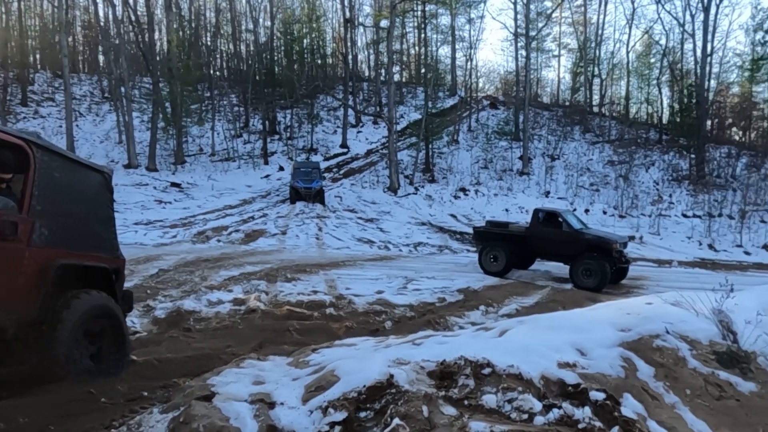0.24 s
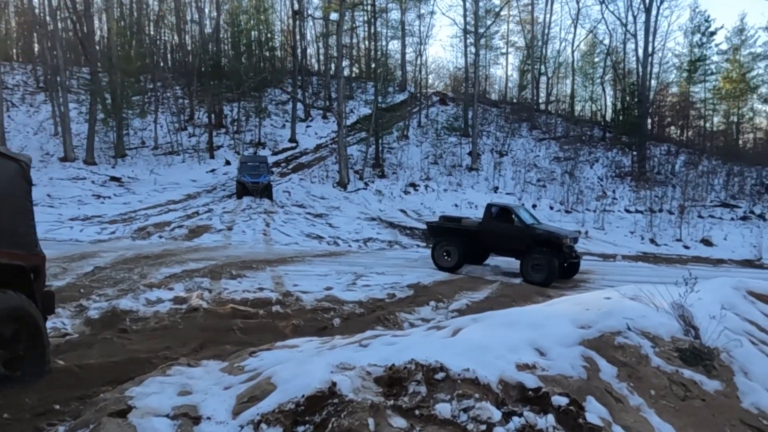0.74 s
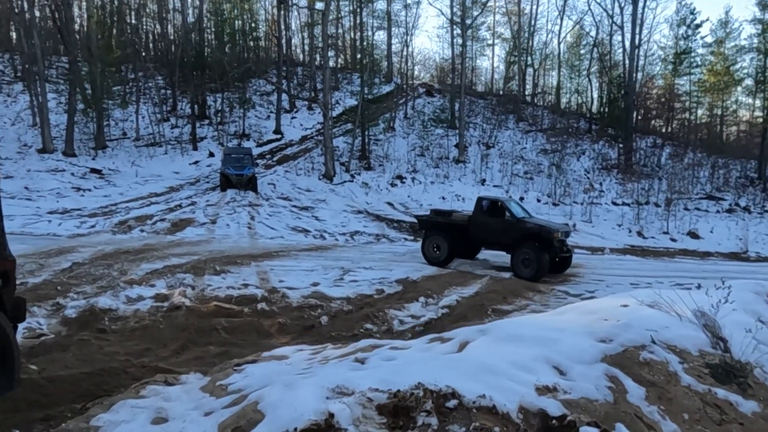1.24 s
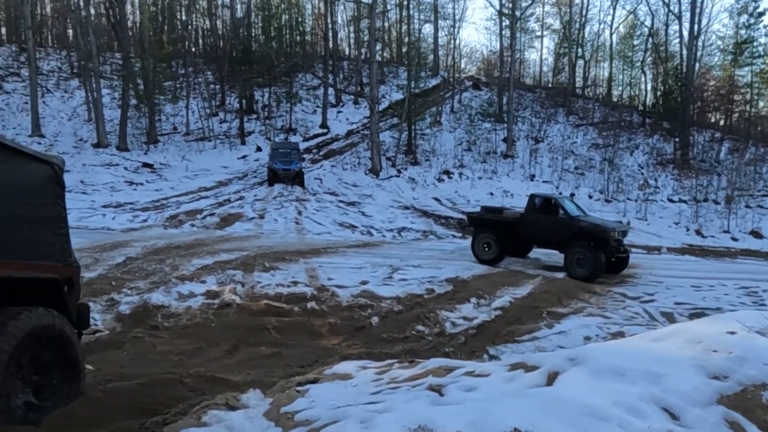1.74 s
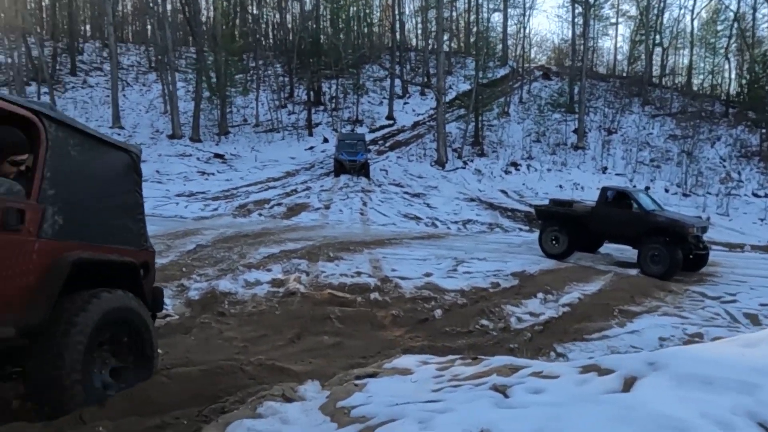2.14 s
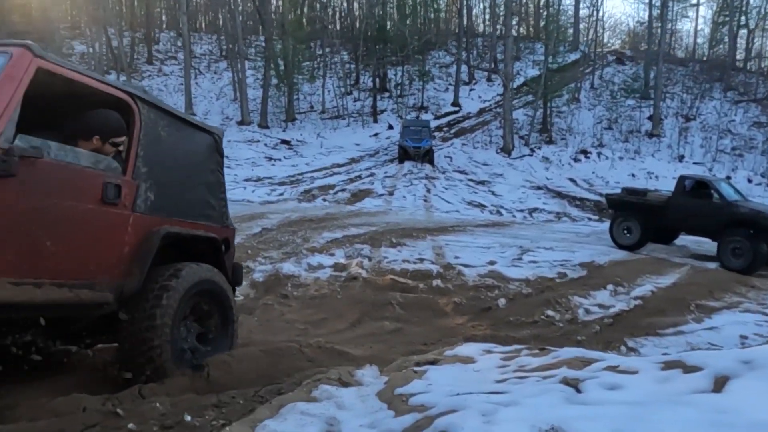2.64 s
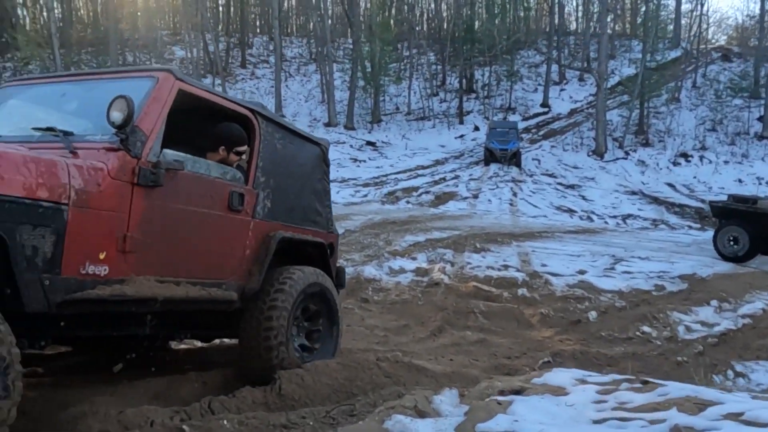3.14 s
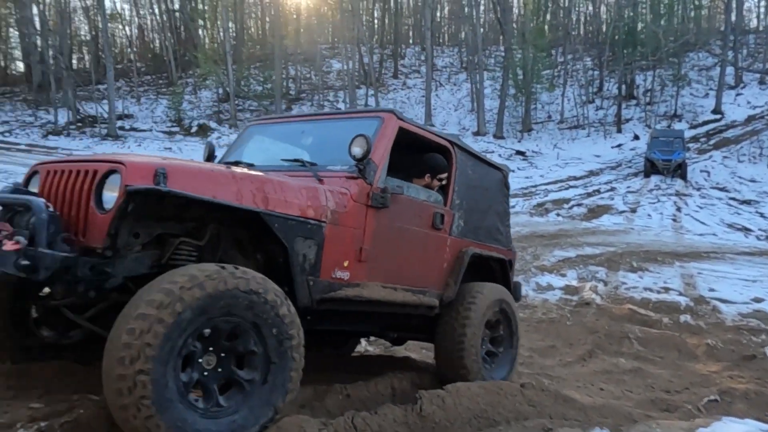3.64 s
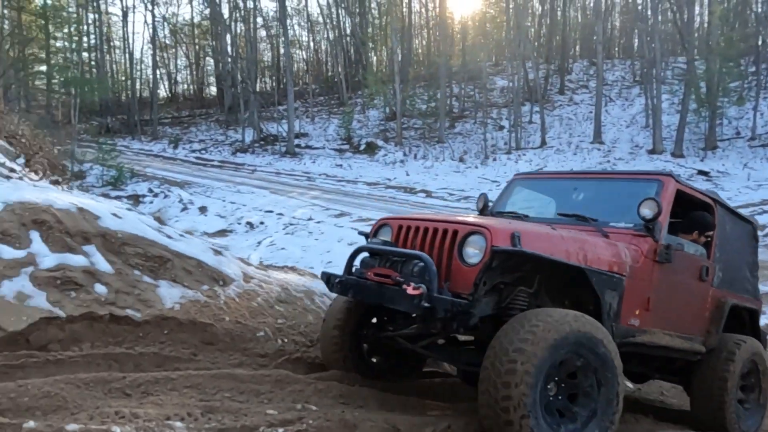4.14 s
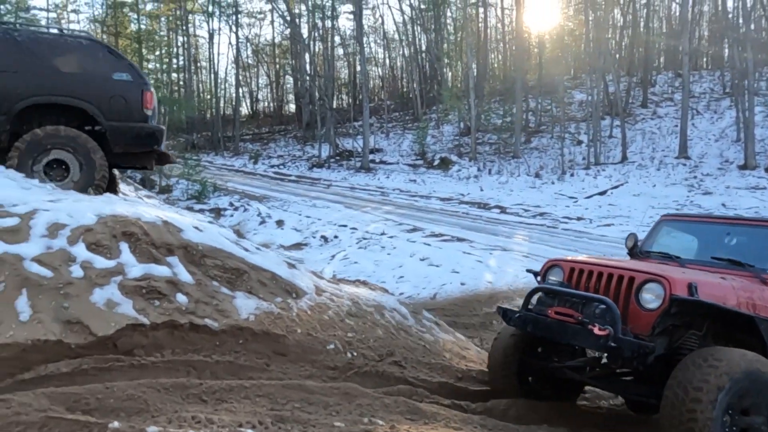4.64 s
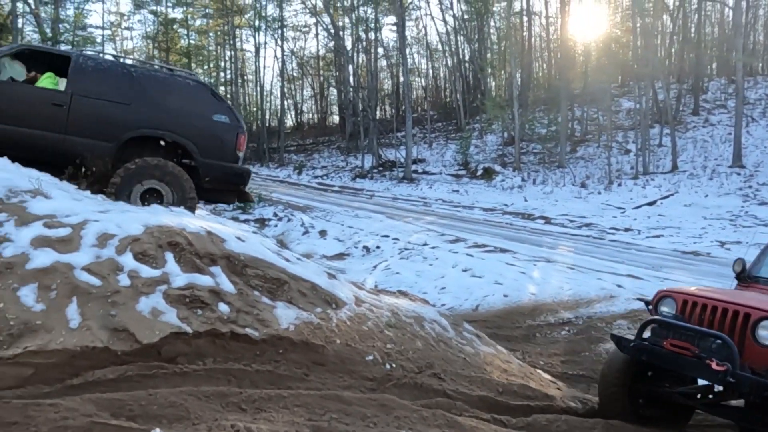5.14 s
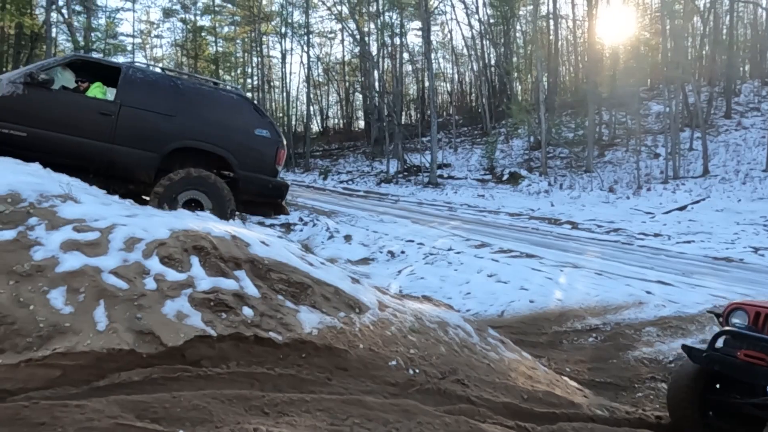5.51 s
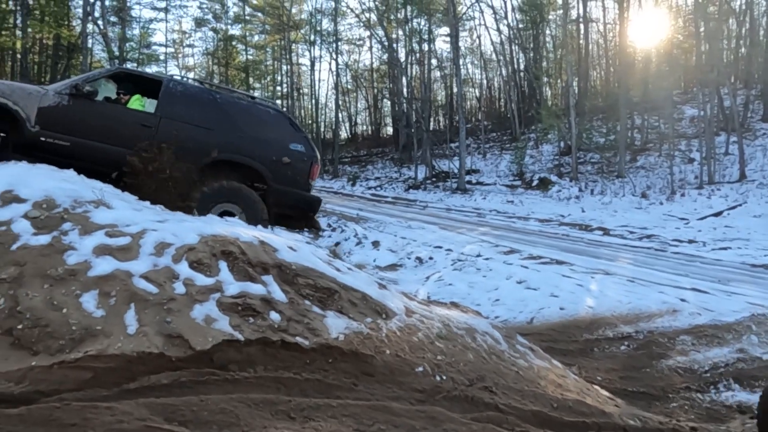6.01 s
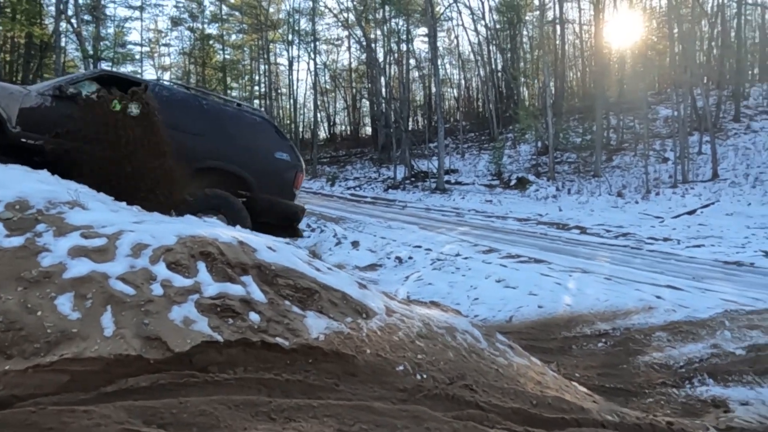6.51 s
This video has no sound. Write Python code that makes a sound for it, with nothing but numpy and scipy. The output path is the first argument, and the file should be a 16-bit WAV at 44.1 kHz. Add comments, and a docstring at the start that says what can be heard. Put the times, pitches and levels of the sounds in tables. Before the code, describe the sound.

Off-road engines outdoors: deep drone and thin squeaks give way to repeated roaring throttle bursts, a popping lull, then a final climbing rev.

```python
"""A steady engine drone with squeals on the left, then hard revving: two eight-cylinder trucks, sand hill, open woods.
Drone: engine-order tones over firing-gated clatter; it slows and fades out. Revved engine: orders sweep through fixed
pipe resonances, firings gate rasp and hiss, throttle stabs open and shut it; its image moves from left to near centre.
Brakes, belts and whistles squeal as gliding sines; pops, shrill air and wind are shaped noise, as is the rumble."""
import sys
import numpy as np
from scipy import signal
from scipy.fft import rfft, irfft, next_fast_len
from scipy.io import wavfile
from scipy.ndimage import uniform_filter1d

SR = 44100
rng = np.random.default_rng(int(sys.argv[2]) if len(sys.argv) > 2 else 0)


def int16_out(signal):
    """Quantize to a 16-bit WAV file."""
    q = np.round(np.clip(np.atleast_2d(signal).T, -1, 1) * 32767)
    wavfile.write(sys.argv[1], SR, q.astype(np.int16))


N = 298557
T = np.arange(N) / SR


def from_db(db):
    """Gain of a level in dB."""
    return 10 ** (np.asarray(db) / 20)


def rms_one(x):
    """Scaled to rms 1."""
    return x / np.sqrt(np.mean(x ** 2) + 1e-20)


def in_time(rows):
    """Columns of a time table, one value per sample."""
    s, *columns = np.transpose(rows)
    return [np.interp(T, s, c) for c in columns]


def at_hz(points, hz):
    """Spectrum table read on a log-frequency axis."""
    table = np.array(points)
    return np.interp(np.log(hz), np.log(table[:, 0]), table[:, 1])


def above(hz, corner_hz):
    """Octaves above a corner, zero below it."""
    return np.log2(np.maximum(hz / corner_hz, 1))


def drift(rate_hz):
    """Slow random wander of spread 1, computed every 40 samples."""
    r = np.exp(-80 * np.pi * rate_hz / SR)
    noise = rng.standard_normal(N // 40 + 2002)
    slow = signal.lfilter([1], [1, -2 * r, r * r], noise)[2000:]
    return np.interp(np.arange(N) / 40, np.arange(len(slow)), rms_one(slow))


def coloured(spectrum, gate=1, repeating=0):
    """Gated white noise plus optional repeating part, shaped by a spectrum, silent outside it; rms 1."""
    size = next_fast_len(N)
    hz = np.maximum(np.arange(size // 2 + 1) * SR / size, 1)
    inside = (hz > spectrum[0][0]) & (hz < spectrum[-1][0])
    source = gate * (rng.standard_normal(N) + repeating)
    shaped = rfft(source, size) * from_db(at_hz(spectrum, hz)) * inside
    return rms_one(irfft(shaped, size)[:N])


def pan(x, left_db):
    """Two channels, left over right by left_db; their mean stays x."""
    ratio = from_db(left_db)
    return x * np.array([ratio, np.ones_like(ratio)]).reshape(2, -1) * 2 / (1 + ratio)


def crank(cycle_hz, wobble):
    """Engine-cycle angle in rad; the speed wavers slightly."""
    return 2 * np.pi * np.cumsum(cycle_hz * (1 + wobble * drift(8))) / SR


# firings of one cycle, 1 = leaves by the nearer pipe: [flag]
NEAR_PIPE = [1, 0, 1, 1, 0, 1, 0, 0]


def firing_phase():
    """Order phases that follow from uneven cylinders dealt to two pipes."""
    return np.angle(np.fft.fft(NEAR_PIPE + 0.12 * rng.standard_normal(len(NEAR_PIPE))))


def puffs(angle, sharp):
    """Gate that jumps at each firing and decays, larger for the nearer pipe."""
    firings = angle * 8 / (2 * np.pi)
    cylinder = firings.astype(int) % 8
    return (2.2 + np.take(NEAR_PIPE, cylinder)) * (np.exp(-sharp * (firings % 1)) + .9)


# revved engine speed: [start_s, cycle_hz]
REV_SPEED = [(0.0, 22.1), (0.21, 20.9), (0.81, 12.1), (0.98, 11.9), (1.32, 21.9), (1.71, 29.6),
             (2.02, 23.4), (2.3, 25.6), (2.45, 20.8), (2.85, 35.4), (3.07, 33.7), (3.37, 38.8),
             (3.58, 35.6), (3.92, 43.4), (4.0, 41.7), (4.19, 33.9), (4.44, 25.1), (4.72, 13.7),
             (4.81, 11.9), (5.09, 20.6), (5.14, 21.0), (5.21, 20.1), (5.41, 11.7), (5.7, 20.6),
             (6.08, 30.0), (6.22, 33.4), (6.39, 36.6), (6.58, 39.1), (6.77, 40.5)]
# how far left and how scattered, throttle open: [start_s, left_db, wide_db]
SIDE = [(0, 4, -2), (.9, 7, -1), (1.4, 19, 4.5), (2.0, 10, 2), (2.6, 12, 1.5), (3.75, 10.5, 1),
        (4.03, 5, -5.5), (4.55, -6, 4.5), (5.0, 1.5, -28), (6.77, -1, -37)]


def revving():
    """Orders, growl, rasp and hiss of one engine; lower parts stand nearer the centre than the rasp."""
    (cycle_hz,), (_, wide_db) = in_time(REV_SPEED), in_time(SIDE)
    (boom_db, bark_db, rasp_db, hiss_db, _), ring_hz, ring_db, left_db = throttle()
    acceleration = uniform_filter1d(np.gradient(cycle_hz) * SR, size=2000)
    slowing = np.clip(-acceleration / 10, 0, 1)
    angle = crank(cycle_hz, wobble=.0015)
    overrun = np.clip((-31 - rasp_db) / 8, 0, 1)  # throttle shut: the engine burbles
    facing = np.clip(1 - np.abs(left_db) / 4, 0, 1)
    boom, bark = rev_orders(cycle_hz, angle, slowing, overrun, facing)
    # at low speed the firings are uneven and the orders blur into growl
    clear = np.clip((cycle_hz - 10) / 18, .1, 1) * (1 - .45 * overrun)
    bark = bark * from_db(bark_db + 6.0) * clear + growl(angle, bark_db, clear)
    rasp = exhaust_rasp(cycle_hz, angle, rasp_db, facing) + throat(cycle_hz, angle, rasp_db, ring_hz, ring_db)
    hiss = intake_hiss(angle, hiss_db) + alternator(cycle_hz, angle, hiss_db, slowing)
    # scattered by trees, opposite in the two channels
    wide = from_db(hiss_db - 6.5) * coloured(HISS) + from_db(rasp_db - 18) * coloured(RASP)
    wide *= from_db(wide_db)
    out = pan(np.sqrt(2) * from_db(boom_db) * boom, 0.023 * left_db)
    out += pan(bark, 0.24 * left_db) + pan(rasp, left_db) + pan(hiss, .45 * left_db)
    return out + wide * [[1], [-1]]


# boom orders, repeating every eight: [multiple, level_db]
REV_ORDERS = [(1, -31.5), (2, -3), (3, -3.5), (4, -17), (5, 4), (6, -6), (7, -4), (8, 7)]
# muffler boom: [hz, gain_db]
BOOM_PIPE = [(25, -17.5), (50, -9), (64, 0), (75, -6.5), (110, 2.5), (140, 0), (190, -12.5), (240, -30),
             (300, -33.5)]
# tailpipe resonances: [hz, gain_db]
BARK_PIPE = [(200, 3), (270, 5), (360, 3.5), (440, -0.5), (520, 0), (700, -3.5), (1000, -2), (1400, 3)]
# tailpipe orders from the sixth up, heard from ahead: [level_db]
BARK_AHEAD = [-23, -27, -15, -12, -18, -17, -19, -11, -15, -31, -19, -22, -35, -24, -22, -29, -33, -26, -30,
              -20, -27, -21, -33, -30, -20, -28, -29, -30]
# same, from the side: [level_db]
BARK_SIDE = [-26, -30, -20, -11, -20, -14, -25, -18, -19, -39, -19, -29, -36, -31, -33, -31, -32, -27, -34,
             -26, -36, -31, -34, -36, -33, -36, -36, -38]
# same, while the speed falls: [level_db]
BARK_SLOWING = [-26, -26, -21, -12, -18, -11, -21, -21, -22, -23, -15, -28, -30, -30, -29, -30, -29, -27,
                -13, -23, -25, -21, -31, -30, -31, -33, -32, -34]
# while slowing only the muffler's centre booms, and the orders even out by a share
COAST_LOSS_DB_PER_OCT, BOOM_HZ, COAST_EVEN_SHARE = 27, 110, .8
FIRING_TOP_HZ, FIRING_TOP_DB_PER_OCT = 127, 31  # the firing order and above boom only low down
SHUT_DULL_DB_PER_OCT = 26  # throttle shut: the bark loses its top
UPPER_ORDERS_DB_PER_CYCLE_HZ = 1.0  # orders above the sixteenth sink below final speed


def rev_orders(cycle_hz, angle, slowing, overrun, facing):
    """Multiples of the engine cycle swept through fixed muffler (boom) and tailpipe (bark) resonances."""
    phase, boom, bark = firing_phase(), 0, 0
    for k in range(1, 6 + len(BARK_AHEAD)):
        hz = k * cycle_hz
        upper = k > 2 * len(NEAR_PIPE)
        flutter_db = (1.2 + 1.2 * (k > 5) + 1.2 * (k > 16) + .8 * overrun) * drift(9)
        wave = np.cos(k * angle + phase[k % 8] - np.pi * k ** 2 / 21) * from_db(flutter_db)
        db = REV_ORDERS[(k - 1) % 8][1] * (1 - COAST_EVEN_SHARE * slowing) + at_hz(BOOM_PIPE, hz)
        db -= 16.0 * overrun * above(hz, 125)
        db -= slowing * COAST_LOSS_DB_PER_OCT * np.abs(np.log2(hz / BOOM_HZ))
        db -= FIRING_TOP_DB_PER_OCT * (k >= len(NEAR_PIPE)) * above(hz, FIRING_TOP_HZ)
        boom = boom + wave * from_db(db) * (hz < BOOM_PIPE[-1][0])
        if k < 6:
            continue
        steady_db = facing * BARK_AHEAD[k - 6] + (1 - facing) * BARK_SIDE[k - 6]
        db = slowing * BARK_SLOWING[k - 6] + (1 - slowing) * steady_db
        db += at_hz(BARK_PIPE, hz) - at_hz(BARK_PIPE, hz[-1])
        db -= SHUT_DULL_DB_PER_OCT * overrun * above(hz, 420)
        db -= UPPER_ORDERS_DB_PER_CYCLE_HZ * upper * np.maximum(cycle_hz[-1] - cycle_hz, 0)
        bark = bark + wave * from_db(db - 2.5 * facing * upper) * (hz > BARK_PIPE[0][0])
    return boom, bark


# growl spectrum: [hz, shape_db]
GROWL = [(200, -18.5), (260, -9), (320, 0.5), (370, -5), (430, -11), (750, -26)]


def growl(angle, bark_db, clear):
    """Firing-gated noise that stands in where the orders blur."""
    return from_db(bark_db - 2) * (1.15 - clear) * coloured(GROWL, puffs(angle, sharp=2.0))


# exhaust rasp from the side: [hz, shape_db]
RASP = [(350, -11.5), (600, -5.5), (710, -5.5), (915, -5.5), (1490, -8), (1650, -10), (1810, -10),
        (2250, -13.5), (2650, -18.5), (4500, -26.5), (5850, -36), (9900, -120)]
# exhaust rasp from ahead at high speed: [hz, shape_db]
RASP_AHEAD = [(350, -5), (600, 1.5), (860, -9.5), (950, 0.5), (1060, -12.5), (1180, -1.5), (1320, -10.5),
              (1730, -8.5), (2060, -13), (2830, -12), (3000, -15), (3740, -16), (6000, -44.5), (7800, -72),
              (13200, -120)]
BRIGHT_FROM_CYCLE_HZ, BRIGHT_SPAN_CYCLE_HZ = 20, 16  # the rasp ahead takes over with speed
REPEAT_GAIN = .7  # noise that is the same in every engine cycle


def exhaust_rasp(cycle_hz, angle, rasp_db, facing):
    """Exhaust noise gated by each firing, part of it repeating every cycle."""
    gate = puffs(angle, sharp=0.92)
    ahead = facing * np.clip((cycle_hz - BRIGHT_FROM_CYCLE_HZ) / BRIGHT_SPAN_CYCLE_HZ, 0, 1)
    step = (angle / (2 * np.pi) % 1 * 1024).astype(int)
    same = REPEAT_GAIN * rng.standard_normal(1024)[step]
    level = from_db(rasp_db + 1.0 * drift(14.0))
    side_part = np.sqrt(1 - ahead) * coloured(RASP, gate, same)
    ahead_part = np.sqrt(ahead) * coloured(RASP_AHEAD, gate, same)
    return level * (side_part + ahead_part)


UPPER_RING_DB = -5.5  # second throat resonance re first


def throat(cycle_hz, angle, rasp_db, ring_hz, ring_db):
    """The throat rings on the engine orders nearest its two pitches, part tone and part noise."""
    order = np.round(ring_hz / cycle_hz)
    band = .7 * coloured([(2, 0), (90, 0), (200, -12), (450, -30)])
    band += .6 * (1 + .8 * np.cos(2 * angle) + .5 * np.cos(3 * angle))
    turn = np.gradient(angle)
    ring = np.cos(np.cumsum(order[0] * turn)) + from_db(UPPER_RING_DB) * np.cos(np.cumsum(order[1] * turn))
    return from_db(rasp_db + ring_db) * band * ring


# intake hiss: [hz, shape_db]
HISS = [(1470, -37.5), (2500, -6.5), (3010, -5.5), (3330, -6), (4500, -8), (6040, -9.5), (6400, -11.5),
        (8290, -19.5), (12300, -31), (13900, -45.5)]


def intake_hiss(angle, hiss_db):
    """Intake air noise, lightly gated by the firings."""
    return from_db(hiss_db - 1.0 + 0.98 * drift(16)) * coloured(HISS, puffs(angle, sharp=0.24))


PULSES_PER_CYCLE = 23.65
WHINE_CENTRE_HZ, WHINE_SQUARED_LOG_WIDTH, WHINE_RE_HISS_DB = 6000, .014, -11.5
# a second window opens while slowing, above a least speed
SLOWING_CENTRE_HZ, SLOWING_MIN_CYCLE_HZ = 4750, 21.5
WHINE_FROM_S = 3.92  # heard once the bonnet faces us


def alternator(cycle_hz, angle, hiss_db, slowing):
    """Harmonics of the alternator pulse rate heard through fixed frequency windows."""
    out = np.zeros(N)
    for k in range(5, 13):
        hz = k * PULSES_PER_CYCLE * cycle_hz
        window = np.exp(-np.log(hz / WHINE_CENTRE_HZ) ** 2 / WHINE_SQUARED_LOG_WIDTH)
        lower = np.exp(-2 * np.log(hz / SLOWING_CENTRE_HZ) ** 2 / WHINE_SQUARED_LOG_WIDTH)
        window += 2 * slowing * (cycle_hz > SLOWING_MIN_CYCLE_HZ) * lower
        gain = from_db(hiss_db + WHINE_RE_HISS_DB - 4 * (k > 9) + 2.5 * drift(9))
        out += gain * window * (T > WHINE_FROM_S) * np.cos(k * PULSES_PER_CYCLE * angle)
    return out


# throttle nearly shut: [start_s, boom_db, bark_db, rasp_db, hiss_db, shrill_db]
COASTING = [(0, -52, -48, -41, -44, -66), (.6, -28.5, -52, -45.5, -48, -66.5),
            (1.6, -22.5, -38, -41.5, -50, -65), (2.3, -26, -37, -42.5, -48, -67.5),
            (3.0, -41, -30.5, -40.5, -47.5, -73), (3.5, -22, -29.5, -37.5, -47.5, -69),
            (3.93, -11, -15, -36.5, -38.5, -67), (4.3, -14, -21.5, -39, -48, -67),
            (4.58, -21.5, -26.5, -45.5, -55, -84), (4.78, -19, -29.5, -47, -57, -92),
            (5.4, -24.5, -32, -49, -59, -100), (5.62, -22.5, -27, -38.5, -53, -62)]
# throttle stabs, levels at mid-hold: [start_s, held_s, release_s, swell_db_per_s, boom_db, bark_db, rasp_db,
# hiss_db, shrill_db, throat_hz, throat_re_rasp_db, upper_throat_hz]
STABS = [(2.53, .31, .1, 8, -17, -25, -31, -46.5, -58, 1870, -10, 2120),
         (3.04, .33, .08, 6, -13, -18, -27.5, -40, -57, 1915, -8, 2130),
         (3.545, .325, .06, 12, -13, -15, -27, -38, -59, 1660, -5, 2420),
         (3.975, .11, .16, -10, -14, -21, -25, -39, -62, 1000, -9, 1600),
         (4.79, .28, .06, -8, -23, -26, -33, -50, -78, 950, -4, 1400),
         (5.43, .12, .06, 0, -19, -23.5, -31, -47, -72, 1200, -12, 1750),
         (5.61, .27, .08, 14, -21, -23, -32, -44, -75, 1500, -14, 1000),
         (5.9, .9, .1, 11, -15, -21.5, -27.5, -40, -70, 1770, -12, 2400)]
# part of the swell taken by boom, bark, rasp, hiss, shrill air: [share]
SWELL_SHARES = [0.54, 0.32, 0.98, 0.79, .8]
ATTACK_S, THROAT_SHUT_DB = 0.061, -35
SHUT_SIDE_SHARE = 0.92  # throttle shut: less one-sided


def throttle():
    """Each stab blends the coasting levels toward its own: attack, swelling hold, release."""
    levels, opening, throat_db = np.array(in_time(COASTING)), np.zeros(N), THROAT_SHUT_DB
    for s, held, release, swell, *db, _, ring_db, _ in STABS:
        falling = 1 - (T - s - held) / max(release, .01)
        on = np.clip(np.minimum((T - s) / ATTACK_S, falling), 0, 1)
        from_middle = np.clip(T - s - held / 2, -held / 2, held / 2)
        full = np.reshape(db, (-1, 1)) + np.outer(SWELL_SHARES, swell * from_middle)
        levels = levels + on * (full - levels)
        opening = np.maximum(opening, on)
        throat_db = throat_db + on * (ring_db - throat_db)
    latest = np.maximum(np.searchsorted([row[0] for row in STABS], T) - 1, 0)
    ring_hz = np.array([(row[-3], row[-1]) for row in STABS])[latest].T
    left_db = in_time(SIDE)[0] * (SHUT_SIDE_SHARE + (1 - SHUT_SIDE_SHARE) * opening)
    return levels, ring_hz, throat_db, left_db


# droning engine speed: [start_s, cycle_hz]
DRONE_SPEED = [(0, 13.2), (2.3, 13.25), (2.5, 12.8), (2.8, 11.6), (3.25, 9.4), (3.55, 8.4), (3.8, 7.7),
               (4.2, 7.2)]
# drone level: [start_s, level_db]
DRONE = [(0, -16.5), (2.4, -16.5), (2.8, -16.5), (3.1, -21), (3.4, -25.5), (3.8, -30), (4.2, -36.5)]
# drone orders at the starting speed: [multiple, level_db]
DRONE_ORDERS = [(1, -40), (2, -35), (3, -25), (4, -21), (5, -3), (6, -13), (7, -13), (8, 0), (9, -19),
                (10, -14), (11, -10), (12, -21), (13, -13), (14, -21), (15, -20), (16, -15), (17, -21),
                (18, -25), (19, -35), (20, -31), (21, -27), (22, -35)]
# muffler resonance: [hz, gain_db]
MUFFLER = [(40, -9.5), (70, -3.5), (105, 4), (140, 7), (210, -11.5), (320, -32)]
# clatter with body resonances: [hz, shape_db]
CLATTER = [(180, -41.5), (340, -22), (390, 8.5), (450, -1.5), (510, -3), (560, 3), (620, -4.5),
           (820, -12.5), (1030, -6.5), (1095, 0), (1160, -11.5), (1235, -0.5), (1310, -11), (1680, -18),
           (3000, -31.5), (6600, -120)]


def drone():
    """Clean orders of a steady engine over gated clatter; the muffler lifts orders that sink into its boom."""
    (cycle_hz,), (level_db,) = in_time(DRONE_SPEED), in_time(DRONE)
    angle, phase = crank(cycle_hz, wobble=.002), firing_phase()
    tones = 0
    for k, db in DRONE_ORDERS:
        hz = k * cycle_hz
        lift_db = at_hz(MUFFLER, hz) - at_hz(MUFFLER, hz[0])
        smear = np.pi * k ** 2 / 18  # the pipe smears the pulses
        wave = np.cos(k * angle + phase[int(k) % 8] + smear)
        tones = tones + from_db(db + lift_db + .8 * drift(4)) * wave
    clatter = from_db(-22.0 + 1.0 * drift(22)) * coloured(CLATTER, puffs(angle, sharp=2.4))
    fade = np.clip((DRONE[-1][0] + 0.52 - T) / 0.21, 0, 1)
    return from_db(level_db) * fade * (np.sqrt(2) * tones + pan(clatter, 4.0))


# brake squeals: [start_s, length_s, first_hz, last_hz, level_db]
BRAKE = [(.29, 0.11, 3490, 3220, -45.5), (.375, 0.078, 3350, 3260, -49), (.48, 0.1, 3310, 3280, -44),
         (.61, 0.048, 3300, 3300, -54), (.76, 0.14, 3420, 3254, -42), (.89, 0.11, 3350, 3290, -43.5),
         (1.1, 0.17, 3340, 3240, -48), (1.27, 0.075, 3260, 3250, -47.5), (1.61, 0.168, 3390, 3430, -38),
         (1.75, .165, 3410, 3270, -48), (2.13, 0.081, 3420, 3450, -48.5), (3.455, 0.065, 3340, 3390, -41.5),
         (3.515, 0.061, 3400, 3280, -39.5)]
# belt chirps: [start_s, length_s, first_hz, last_hz, level_db]
BELT = [(0, 0.086, 5750, 5850, -51), (.075, 0.051, 6000, 5950, -45), (.44, 0.1, 5850, 6000, -45.5),
        (.55, 0.031, 5900, 5950, -43), (.9, 0.039, 5870, 6070, -49)]
# faint whines: [start_s, length_s, first_hz, last_hz, level_db]
WHINE = [(1.35, 1.2, 7200, 6840, -63), (2.55, 0.34, 6750, 7050, -53), (3.36, 0.51, 7200, 6870, -54.5),
         (5.65, 0.39, 6900, 6870, -65)]
# high whistles: [start_s, length_s, first_hz, last_hz, level_db]
WHISTLE = [(1.65, .08, 10450, 10350, -68), (1.86, .11, 10400, 10400, -64.5),
           (2.0, 0.061, 10400, 10840, -66), (2.17, 0.058, 10350, 10360, -66),
           (2.265, 0.055, 10570, 10500, -64), (2.36, 0.057, 10450, 10400, -64.5),
           (2.42, .11, 10350, 10500, -64), (2.6, 0.45, 10550, 10350, -71), (3.93, .3, 10370, 10640, -54.5),
           (4.22, .22, 10600, 10040, -55), (4.43, 0.15, 10200, 10400, -58), (4.56, 0.16, 10200, 10500, -69),
           (5.07, .35, 10450, 10400, -78)]


def squeals():
    """Brake, belt, whine and whistle tones; the whistles have a weaker upper partial."""
    out = squeal(BRAKE, spread_hz=15, flutter_db=1.3, fade_db_per_s=14, edge_s=.014)
    out += squeal(BELT, spread_hz=57, flutter_db=2.5, fade_db_per_s=-11, edge_s=0.0093)
    out += squeal(WHINE, spread_hz=130, flutter_db=4.0, fade_db_per_s=-2.0, edge_s=0.022)
    out += squeal(WHISTLE, spread_hz=100, flutter_db=4.5, fade_db_per_s=0, edge_s=.02)
    out += from_db(-14) * squeal(WHISTLE, spread_hz=130, flutter_db=4, fade_db_per_s=0, edge_s=.02, ratio=1.29)
    return out


def squeal(rows, spread_hz, flutter_db, fade_db_per_s, edge_s, ratio=1):
    """Stick-slip tones: sines that glide and jitter in pitch, fade or swell, flutter, soft at the ends."""
    out = np.zeros(N)
    jitter_hz, flutter = spread_hz * drift(120), from_db(flutter_db * drift(38))
    for s, length, first_hz, last_hz, db in rows:
        since = np.clip(T - s, 0, length)
        edge = np.clip(np.minimum(since, length - since) / edge_s, 0, 1)
        pitch_hz = ratio * (first_hz + (last_hz - first_hz) * since / length) + jitter_hz
        gain = np.sqrt(2) * edge * from_db(db - fade_db_per_s * since)
        out += gain * np.cos(2 * np.pi * np.cumsum(pitch_hz) / SR)
    return out * flutter


# throttle-off pops: [start_s, level_db]
POPS = [(4.478, -20), (4.588, -24), (4.751, -22), (5.499, -20)]


def pops():
    """Short noisy bursts coloured by the tailpipe."""
    gate = np.zeros(N)
    for s, db in POPS:
        since = np.maximum(T - s, 0)
        gate += from_db(db) * (1 - np.exp(-since / .0008)) * np.exp(-since / .012)
    burst = gate * coloured([(200, 13.5), (500, 15.0), (1100, -5.5), (2500, -34)])
    return pan(burst, left_db=-11)


# shrill air: [hz, shape_db]
SHRILL = [(10800, -9.5), (11500, -13.5), (12200, -2.5), (13000, -7), (13800, -12.5), (15600, -28.5)]


def shrill_air(shrill_db, left_db):
    """Treble air noise that follows the throttle."""
    return pan(from_db(shrill_db + 1.3 * drift(20)) * coloured(SHRILL), 3 + 1.4 * left_db)


def scattered_air(shrill_db, wide_db):
    """The same treble scattered to the sides, opposite in the two channels."""
    return from_db(shrill_db - 5 + .5 * wide_db) * coloured(SHRILL) * [[1], [-1]]


# body and ground rumble: [hz, shape_db]
RUMBLE = [(20, -12), (35, -6), (60, -2), (110, 0), (200, -8), (350, -14), (600, -30)]


def rumble():
    """Low noise of body and ground, wandering in level."""
    return from_db(-30.5 + 6.7 * drift(2.6)) * coloured(RUMBLE)


# wind on the microphone ports: [start_s, level_db]
WIND = [(0, -42), (4.1, -40), (4.25, -32), (4.5, -35), (5.0, -33), (5.3, -27), (5.6, -38), (6.4, -41),
        (6.77, -35)]


def wind(wide_db):
    """Low turbulence noise: gusts common to both channels plus a part opposite in them."""
    (wind_db,) = in_time(WIND)
    gusts = from_db(wind_db + 3 * drift(6)) * coloured([(15, -12), (28, -3), (45, 0), (70, -10)])
    sideways_db = wind_db - 2 + np.minimum(wide_db, -4) + 4 * drift(3)
    sideways = from_db(sideways_db) * coloured([(15, 0), (45, -5), (90, -9), (200, -9), (300, -20)])
    return gusts + sideways * [[1], [-1]]


def scene():
    """Squeals, shrill air, wind, rumble, pops and the two engines."""
    (levels, *_, left_db), (_, wide_db) = throttle(), in_time(SIDE)
    mix = pan(squeals(), .5 * left_db)
    mix += shrill_air(levels[-1], left_db)
    mix += wind(wide_db)
    mix += rumble()
    mix += drone()
    mix += pops()
    mix += scattered_air(levels[-1], wide_db)
    return mix + revving()


def record(dry):
    """Quick gain control evens out the loudest throbs, peaks are rounded, the top is cut."""
    level = np.sqrt(uniform_filter1d(np.mean(dry ** 2, axis=0), size=900) + 1e-12)
    gain = np.minimum(1, (level / from_db(-14)) ** -.4)
    rounded = 1.106 * np.tanh(gain * dry / 1.087)
    top_cut = signal.cheby2(12, 70, 15700, fs=SR, output="sos")  # stopband edge in Hz
    return signal.sosfilt(top_cut, rounded)


dry = scene()
out = record(dry)
int16_out(out)
```